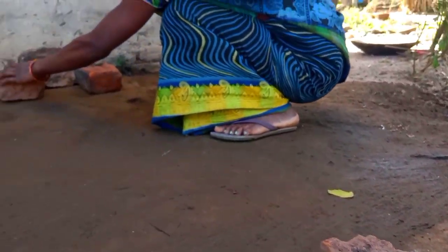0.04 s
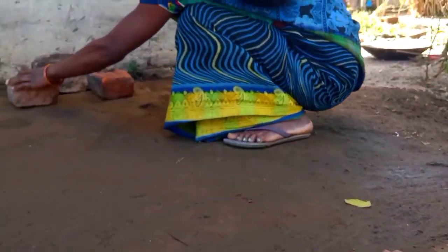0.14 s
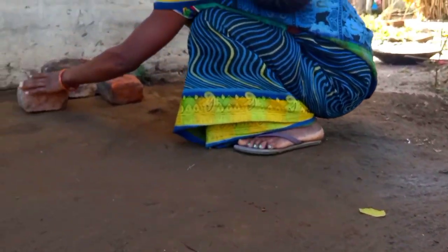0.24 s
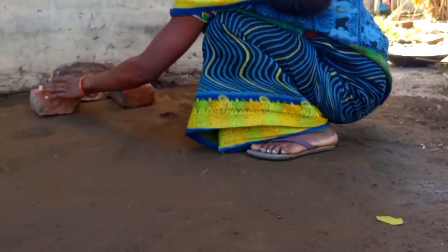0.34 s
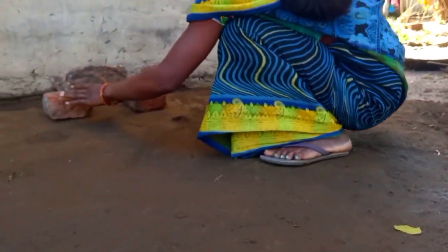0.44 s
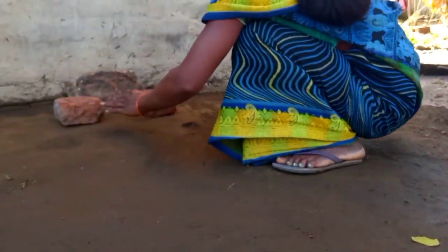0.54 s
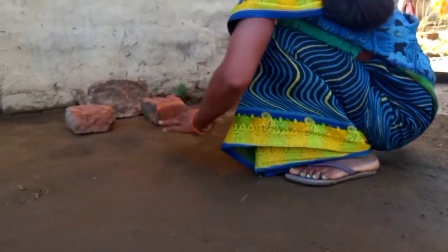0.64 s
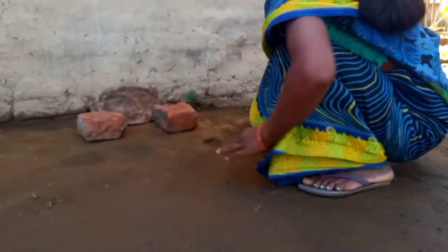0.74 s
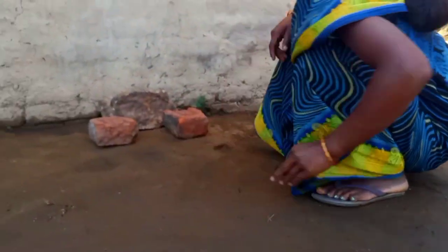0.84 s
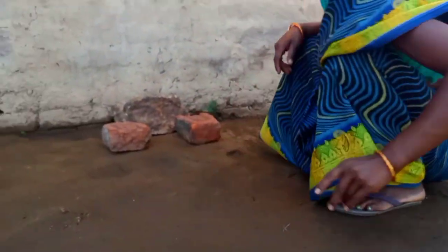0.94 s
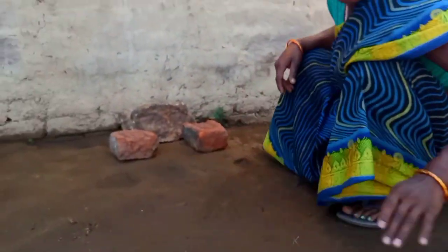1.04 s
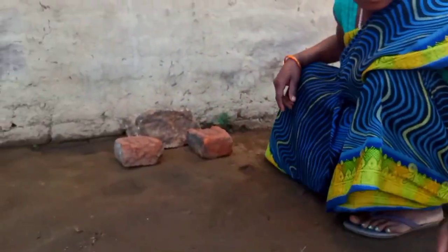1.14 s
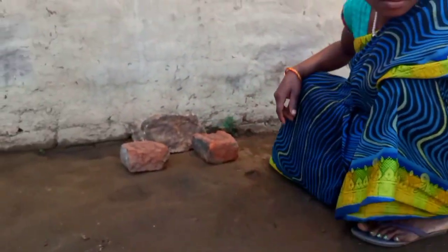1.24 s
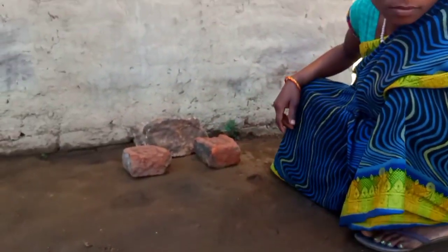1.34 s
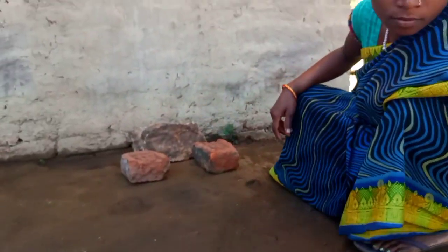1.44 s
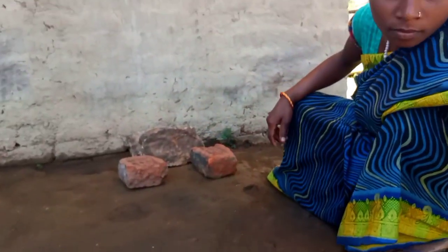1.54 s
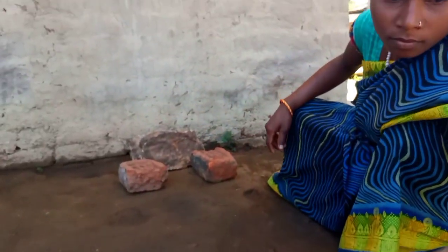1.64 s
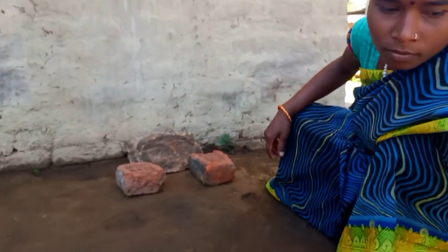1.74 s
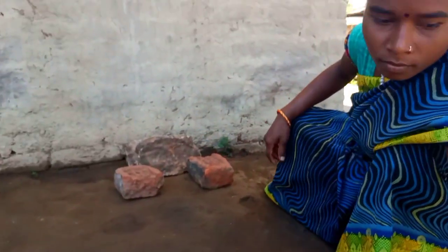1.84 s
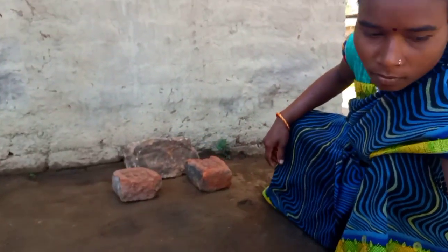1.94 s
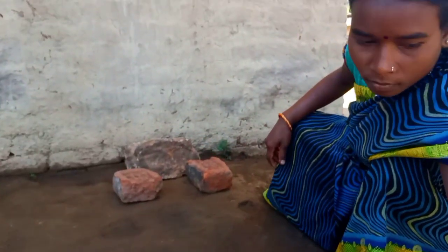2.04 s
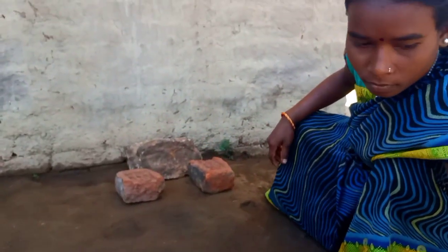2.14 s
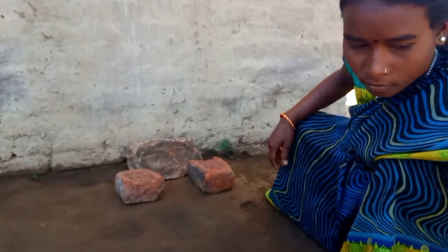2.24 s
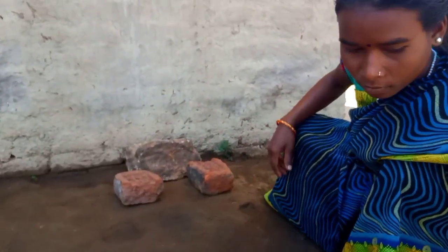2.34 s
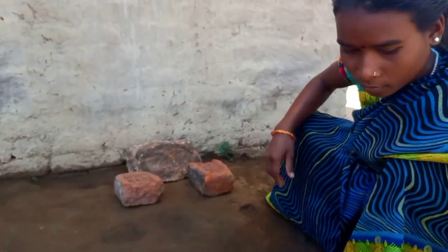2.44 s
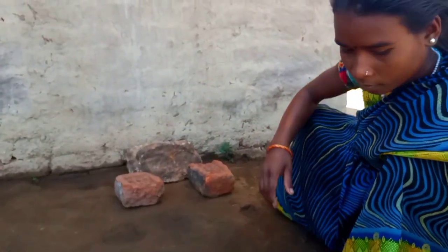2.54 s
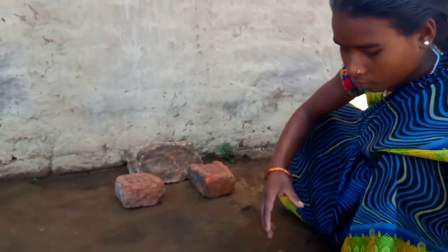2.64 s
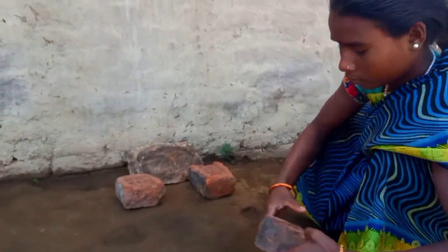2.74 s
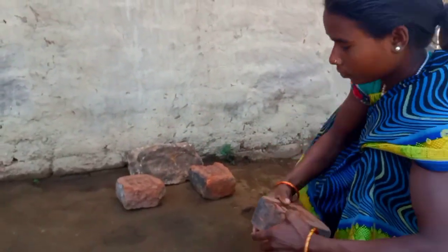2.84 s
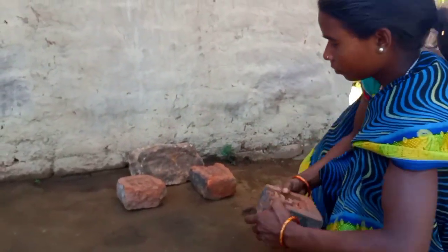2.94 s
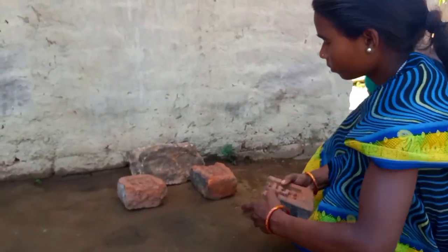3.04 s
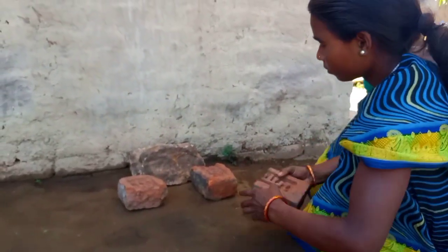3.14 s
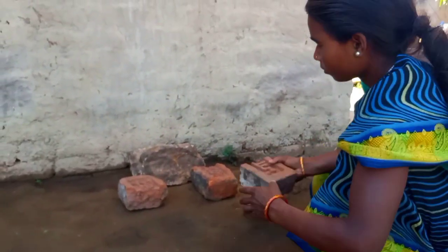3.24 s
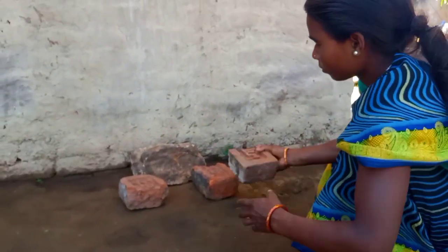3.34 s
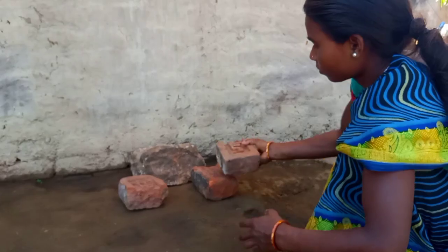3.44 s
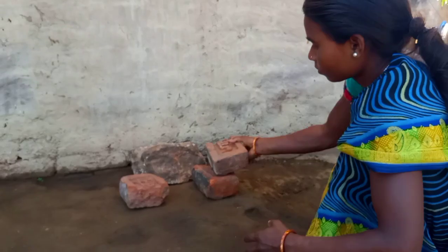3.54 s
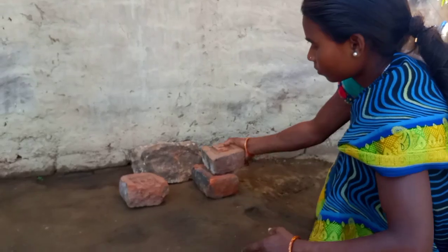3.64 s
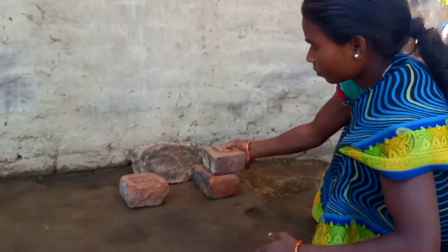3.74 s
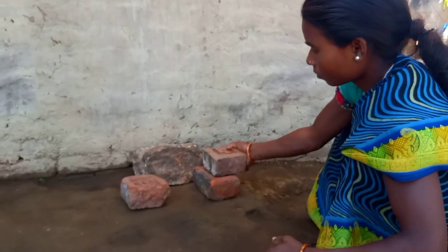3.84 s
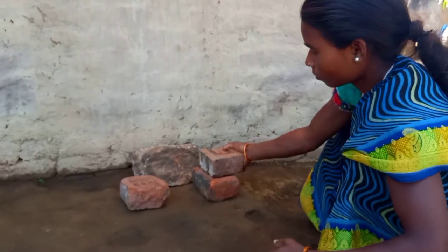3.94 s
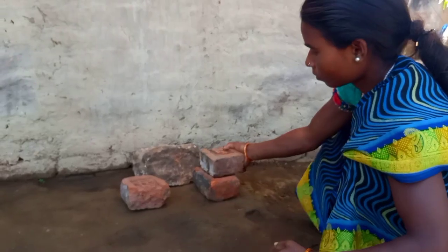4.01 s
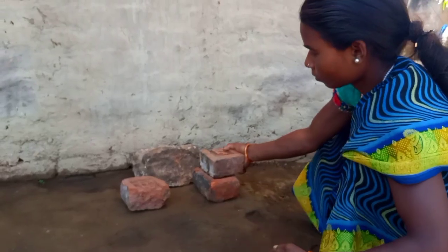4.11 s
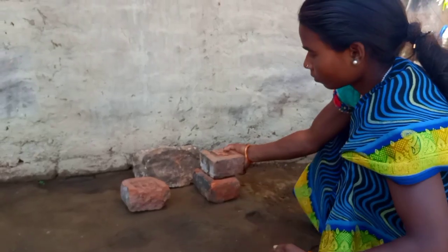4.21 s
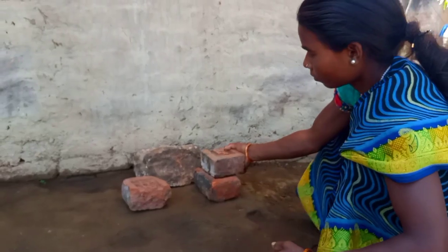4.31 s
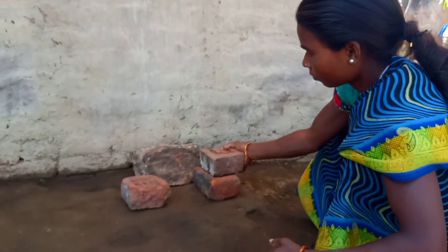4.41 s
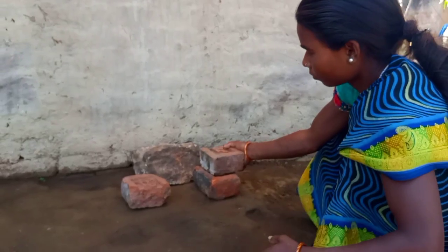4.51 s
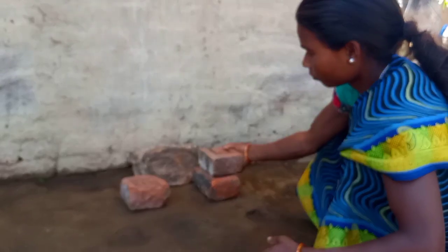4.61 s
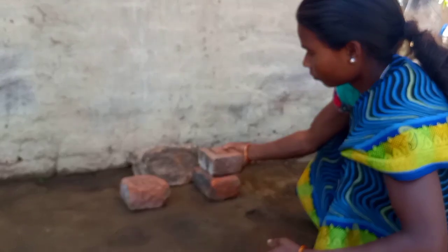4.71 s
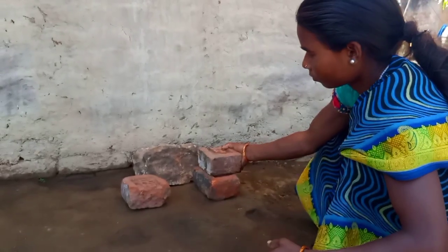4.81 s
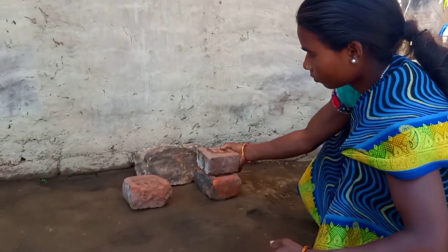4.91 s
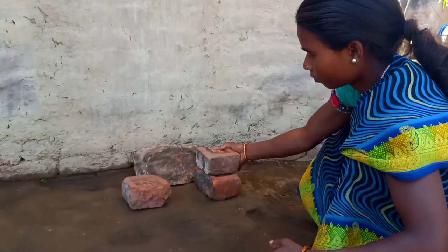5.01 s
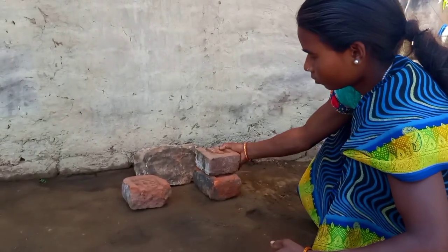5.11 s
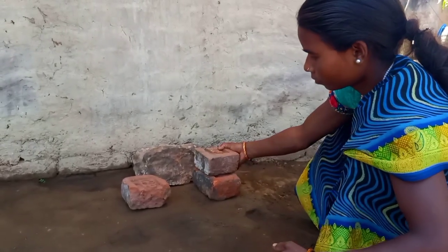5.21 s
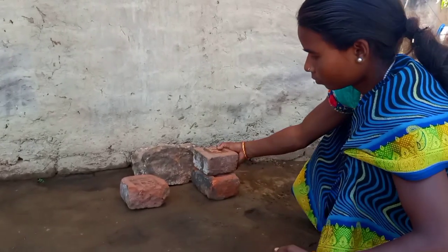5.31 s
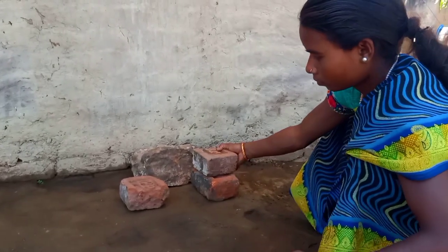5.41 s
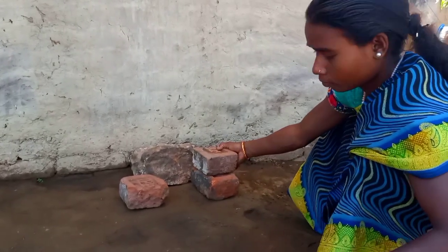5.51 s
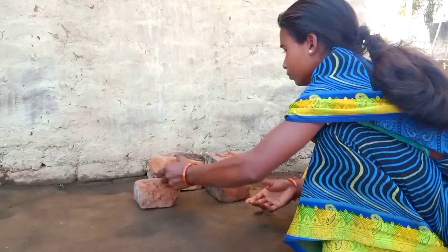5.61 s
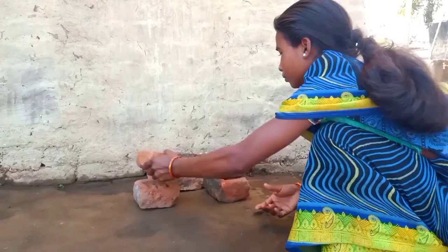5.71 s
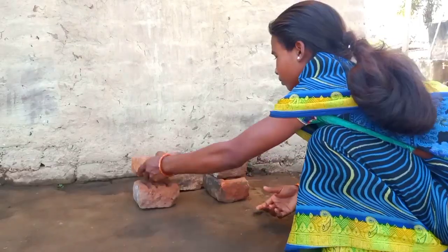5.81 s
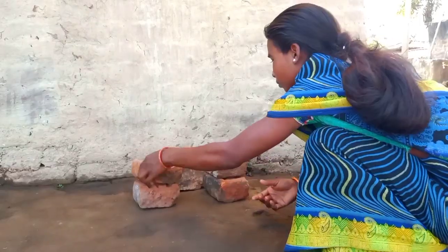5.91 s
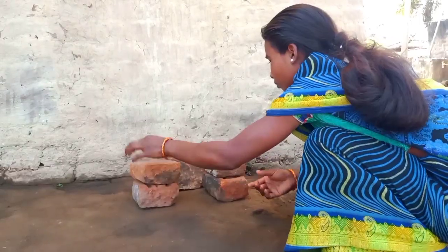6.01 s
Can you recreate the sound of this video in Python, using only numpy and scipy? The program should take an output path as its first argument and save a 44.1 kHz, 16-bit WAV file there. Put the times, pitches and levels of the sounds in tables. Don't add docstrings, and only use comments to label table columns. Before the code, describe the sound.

Close to a phone microphone in a yard beside a wall, one loud bright brick clink rings and fades quickly. After a long quiet gap come small ticks, a sharp clack and a short gritty drag. Later a brick settles with a snap and twisting rasp, then faint rubs and a soft grind. A firm, dull double knock ends it.

```python
import sys
import numpy as np
from scipy import signal
from scipy.fft import rfft, irfft
from scipy.io import wavfile
from scipy.ndimage import uniform_filter1d

SR = 44100
rng = np.random.default_rng(int(sys.argv[2]) if len(sys.argv) > 2 else 0)


def generate_wav(signal):
    frames = np.transpose(np.atleast_2d(signal))
    scaled = np.clip(frames, -1, 1) * 32767
    pcm = np.round(scaled).astype(np.int16)
    wavfile.write(sys.argv[1], SR, pcm)


def level_to_linear(level):
    exponent = np.asarray(level, float) / 20
    return 10 ** exponent


N = 267246
LEAD = 350
PHONE_HZ = 16000

# start_s, peak_db, grip_ms (until hand or ground chokes the ring), echo_db, echo_length (factor)
BLOWS = [(0.4783, -9.5, 15, -12, 0.67), (0.4852, -18.5, 15, -8, 0.94), (2.2737, -47, 1.3, -5.5, 0.4),
         (2.3328, -32, 3, -6, 0.59), (2.4047, -20, 0.79, -2.5, 0.18), (2.4114, -32.5, 7, -9.5, 0.67),
         (2.4967, -48.5, 7.89, -7, 0.22), (3.6893, -22.5, 0.54, -12, 0.19), (3.739, -40.5, 2.8, 0, 0.78),
         (4.905, -53.5, 9.16, -14, 0.69), (5.9572, -19.5, 1.5996, -9.5, .4),
         (5.9601, -9.5, 8.7, -24.5, 0.23)]
# start_s, stop_s
IDLE_SPANS = [
    (1.95, 2.23),
    (2.885, 2.99),
    (3.04, 3.43),
    (3.615, 3.65),
    (5.76, 5.84),
]


def evened(x):
    return x / np.sqrt(np.mean(x ** 2) + 1e-30)


def read(points, hz):
    f, value = np.transpose(points)
    return np.interp(np.log(hz + 1), np.log(f + 1), value)


def coloured(x, points):
    gain = level_to_linear(read(points, np.fft.rfftfreq(len(x), 1 / SR)))
    return irfft(rfft(x) * gain, len(x))


def add(mix, s, sound):
    part = mix[round(s * SR):][:len(sound)]
    part += sound[:len(part)]


def during(spans, edge_s):
    t = np.arange(N) / SR
    half = edge_s / 2
    gain = np.zeros(N)
    for start, stop in spans:
        gain += np.interp(t, [start - half, start + half, stop - half, stop + half], [0, 1, 1, 0])
    return gain


def struck(body, rise_ms, grip_ms, blur=1, size=4096):
    hz, width_hz, level_db = np.transpose(body)[:, :, None]
    ms = 1000 * (np.arange(size) - LEAD) / SR
    swell = 1 / (1 + np.exp(-ms / rise_ms))
    after_ms = rise_ms * np.logaddexp(0, ms / rise_ms)
    dying = np.exp(-np.pi * blur * width_hz * after_ms / 1000 - (after_ms / grip_ms) ** 2)
    sines = np.sin(2 * np.pi * (hz * ms / 1000 + rng.random(hz.shape)))
    return swell * (level_to_linear(level_db) * width_hz * dying * sines).sum(0)


def yard(bright_db, slow, decays=None):
    # hz, t60_s
    yard_decays = [(120, 0.35), (340, 0.12), (960, 0.18), (1400, 0.026), (1800, 0.19), (2300, 0.071),
                   (3800, 0.15), (5400, 0.067), (7500, 0.19)]
    if decays is None:
        decays = yard_decays
    hz, t, z = signal.stft(rng.standard_normal(SR // 2), SR, nperseg=128)
    hz = hz[:, None]
    level_db = -60 * t / (slow * read(decays, hz)) + bright_db * np.log2((hz + 200) / 2000)
    tail = signal.istft(z * level_to_linear(level_db), SR, nperseg=128)[1]
    tail = tail * np.linspace(1, 0, len(tail))
    return tail / np.linalg.norm(tail)


def ripple():
    # start_s, stop_s
    still = [
        (.02, .435),
        (3.454, 3.55),
    ]
    wave = 1 - np.cos(2 * np.pi * np.arange(N) / 1024)
    return 1.4 * wave * during(still, .004)


def knocks():
    # hz, width_hz, level_db; first the full clear ring
    clink = [(523.9, 23, -17.5), (1184.7, 60, -9.5), (1797, 50, -7), (886, 29, -21), (2410, 30, -3),
             (2575.8, 47, -1), (2755, 49, -8.5), (3010, 48, -6.5), (3020, 30, -12), (3340, 48, -5.5),
             (3650, 40, -4), (4037.4, 30, -2), (4180, 21, -5),
             (4454.7, 38, -4.5), (4737, 60.22, -9), (5070, 66, -10), (2158.9, 220, -10), (5250, 120, -11),
             (5470, 59.54, -13), (5943, 54, -19), (6190, 96, -22), (6477, 76, -24), (6920, 94, -23.5),
             (7270, 90, -29.5)]
    tick = [(2200, 1100, 3.5), (3495, 1300, -3.5), (4900, 1300, -5), (6280, 1200, -8.5)]
    tap = [(2390, 360, 0), (3990, 580, -12), (5200, 2700, -9), (6270, 450, -19.5)]
    clack = [(1956.8, 600, -36), (3209, 970, 14), (5020, 96, 7)]
    bounce = [(1920, 76, 15), (2940, 1300, 6), (3707, 650, 8), (5700, 690, -11), (6754.7, 280, -12.5),
              (6980, 68, -33)]
    settle = [(1800, 980, -2), (2850, 960, -12), (4152.4, 340, 0), (925, 980, -16.5)]
    snap = [(450, 309.4, -38), (1436.5, 550, -39), (3520, 258.53, 0), (4520, 370, -6.5), (5300, 600, -15),
            (6538.5, 280, -31)]
    catch = [(2640, 110, -24), (4052, 120, -17.5), (4690, 120, 16.5), (5577, 90, -7)]
    nudge = [(3230, 300, -10), (4033, 160, 9), (4920, 260, 0.5), (5440, 300, -3.5)]
    thud = [(551, 79, -2), (1045.6, 200, -5), (1591.9, 300, -11.5), (2268.5, 120, -14.5), (3365, 91, -23.5),
            (4189.7, 300, -28.5), (5514, 230, -33), (6295.1, 140, -49), (6813, 120, -54)]
    # hz, level_db
    light = [(200, -24), (600, -9), (1300, -1.5)]
    ring = clink
    bodies = ring, ring, tick, tap, clack, bounce, settle, snap, catch, nudge, thud, thud
    out = np.zeros(N)
    for (s, peak_db, grip_ms, echo_db, slow), body in zip(BLOWS, bodies):
        rise_ms, bright_db = .36, 0.0971
        if body is thud:
            rise_ms, bright_db = 0.43, 3
        if body is tap or body is clack:
            rise_ms = 0.19
        if body is catch or body is nudge:
            rise_ms, bright_db = 1.8, 3.5
        blow = struck(body, rise_ms, grip_ms)
        if body in (tick, tap, clack, bounce):
            blow = coloured(blow, light)
        blow *= level_to_linear(peak_db) / abs(blow).max()
        crack = struck(body, 0.071, 0.97, blur=3.4)
        echo = signal.fftconvolve(crack, yard(bright_db, slow))
        if body in (clack, bounce):
            echo = coloured(np.pad(echo, (0, len(echo) % 2)), light)
        echo *= level_to_linear(echo_db) * np.linalg.norm(blow) / np.linalg.norm(echo)
        add(out, s - LEAD / SR, blow)
        add(out, s - LEAD / SR, echo)
    return out


def murmurs():
    # start_s, level_db
    onsets = [
        (.480, -28),
        (5.962, -42.5),
    ]
    # hz, level_db
    tones = [
        [(120, -74.5), (200, -44.5), (476, -14), (682, -23), (792, -12.5), (893, -25), (1020, -10.5),
         (1530, -17), (1780, -4), (3050, -6.5), (3430, -15.5), (3870, -7), (7150, -41), (9300, -72),
         (15700, -120)],
        [(120, -33.5), (200, -17), (353, -24.5), (469, -0.5), (703, -4.5), (920, -13.5), (1300, -11), (1750, 0),
         (1920, -6), (2360, -9), (3050, -19), (3990, -12), (7150, -30.5), (9300, -63), (15700, -120)],
    ]
    # hz, t60_s
    dampings = [
        [(300, 0.16), (1000, 0.14), (1800, .2), (2300, .15), (3500, 0.1416), (5000, 0.15), (7000, .12)],
        [(300, 0.092), (1000, 0.13), (1800, 0.1), (3000, .12), (5000, 0.11), (7000, 0.11)],
    ]
    # hz, width_hz, level_db
    lasting_modes = [(529, 11, -9), (1766, 8.4, -4.5), (1738, 10, 0.5), (1954, 13, -4), (2260, 16, -6),
                     (3055, 16, -8), (3684, 14, -7.5), (5250, 15, -14)]
    out = np.zeros(N)
    for (s, level_db), tone, damping in zip(onsets, tones, dampings):
        tail = coloured(np.pad(yard(0, 1, damping), 2000), tone)[2000:-2000]
        tail *= 1 - np.exp(-np.arange(len(tail)) / 60)
        peak_rms = np.sqrt(uniform_filter1d(tail ** 2, size=400).max())
        add(out, s, level_to_linear(level_db) * tail / peak_rms)
    ring = struck(lasting_modes, .5, 120, size=9000)
    add(out, BLOWS[0][0] - LEAD / SR, level_to_linear(-30) * ring / abs(ring).max())
    return out


def hiss():
    # hz, level_db
    air_tone = [(120, -29.5), (300, -6.5), (550, -3), (900, -5), (1800, -3.5), (3000, -6.5), (5000, -5.5),
                (7000, -13.5), (9000, -41.5)]
    # start_s, stop_s
    open_spans = [
        (0.478, 1.936),
        (2.275, 2.83),
        (3.673, 5.745),
        (5.855, 6.1),
    ]
    # start_s, level_db, t60_s
    stirs = [
        (.5, -77, .7),
        (1.33, -104, 0.8988),
        (2.29, -87.5, 1),
        (3.69, -93, 3.1),
        (4.64, -99, 1.1),
        (4.9, -98, 1.8),
        (5.29, -101, 0.5),
    ]
    # hz, level_db
    loop_lines = [(549.1, -115), (651.4, -115), (850.6, -114), (1798, -113), (2600, -115), (2751, -117),
                  (2848, -116), (3149, -117), (3548, -116), (4000, -113), (4199, -117), (4398, -118)]
    settled, edge_s, fresh_share = level_to_linear(-102.5), .03, .45
    t = np.arange(N) / SR

    turn, size = rng.standard_normal((2, SR // 100 + 1))
    scrap = irfft(np.exp(9j * turn) * level_to_linear(2 * size), SR // 50)
    fresh = evened(coloured(rng.standard_normal(N), air_tone))
    loop = evened(coloured(np.resize(scrap, N), air_tone))
    loop = evened(loop + .12 * fresh)
    lines = np.zeros(N)
    for hz, level_db in loop_lines:
        lines += level_to_linear(level_db) * np.sin(2 * np.pi * 50 * round(hz / 50) * t)

    stirred = np.zeros(N)
    for s, level_db, t60 in stirs:
        dying_db = level_db - 60 * np.maximum(t - s, 0) / t60
        stirred += during([(s, N / SR + 1)], edge_s) * level_to_linear(dying_db)
    opened = during(open_spans, edge_s)
    looped = opened * (settled + (1 - fresh_share) * stirred)
    idle = level_to_linear(-114) * during(IDLE_SPANS, edge_s)
    return loop * (looped + idle) + lines * looped / settled + fresh_share * fresh * stirred * opened


def whine():
    t = np.arange(N) / SR
    tone = np.zeros(N)
    for k in range(3):
        tone += level_to_linear(-6.5 * k) * np.sin(2 * np.pi * (k + 1) * PHONE_HZ / 8 * t)
    flutter_db = 2.7 * evened(uniform_filter1d(rng.standard_normal(N), size=1500))
    return tone * level_to_linear(-108 + flutter_db) * during(IDLE_SPANS, .01)


def pressure(touch, push, lift, touch_db, end_db):
    land_s, land_db, lift_db, lift_bend = .014, 20.5, 37.5, 0.93
    t = np.arange(-land_s, push + lift, 1 / SR)
    held_db = np.interp(t, [-land_s, 0, push], [touch_db - land_db, touch_db, end_db])
    lifted = np.clip((t - push) / lift, 0, 1) ** lift_bend
    return touch + t, held_db - lift_db * lifted


def slide(stroke, body, dust_db):
    # hz, level_db
    dust_tone = [(120, -56), (200, -15), (587, -15.5), (1510, -11), (2000, -10), (3430, -6), (3870, 9),
                 (4230, -21), (4850, -4.5), (7150, -22), (9300, -47), (15700, -120)]
    grains_per_s = 2500
    t, now_db = pressure(*stroke)
    chance, _, sign, _, sand = rng.random((len(t), 5)).T
    grains = (chance < grains_per_s / SR) * np.sign(sign - .5)
    faces = signal.fftconvolve(grains, struck(body, 0.18, 6.7, blur=1.4))[LEAD:][:len(t)]
    crowding = uniform_filter1d(abs(grains), size=40)
    dust = coloured((sand - .5) * (1 + 4 * crowding), dust_tone)
    ringing = level_to_linear(.3 * (now_db - now_db.max()))
    rasp = evened(ringing * evened(faces) + level_to_linear(dust_db) * evened(dust))
    return t[0], rasp * level_to_linear(now_db) * signal.windows.tukey(len(t), .06)


def slides():
    # touch_s, push_s, lift_s, touch_db (pressure at touch), end_db (pressure at end of push)
    strokes = [
        (2.284, .004, 0.036, -75, -82.5),
        (2.345, 0.013469, 0.06366, -58, -46.5),
        (3.687, .048, .006, -73.5, -67.5),
        (3.742, 0.038, 0.081, -56, -54),
        (4.05, .032, 0.086, -81, -72),
        (4.636, 0.029, 0.056, -71, -71),
        (4.901, .083, 0.098, -70.5, -63.5),
    ]
    sand_levels = [-3, -6, -7.5, -18.5, -4, -9.5, -5]
    # hz, width_hz, level_db
    drag = [(2111.9, 160, -5), (2520, 31, 1.5), (3282, 34, -10.5), (4000, 32, 0.5), (4200, 10, -7.5),
            (5160, 17, -9), (6210, 71, -37)]
    twist = [(2584.7, 130, -10.5), (3850, 27, 6.5), (4310, 19, 0.5), (4869, 43, -6.5), (4810, 90, 0),
             (5480, 74, -6), (6335, 23, -20)]
    shift = [(1770, 260, -6), (2450, 150, -8), (4070.1, 110, 10), (4837.3, 100, 12.5), (5530, 330, -7)]
    rub = [(2497.8, 410, -10.5), (4000, 380, 4.5), (4907, 220, 5.5), (5350, 300, -3), (6600, 400, -12.5)]
    grind = [(1774.5, 260, -14), (3167.9, 170, 0), (4260.8, 300, -4), (3650, 300, -13), (4621.8, 300, -9),
             (5200, 340, -11), (5700, 300, -18.5)]
    out = np.zeros(N)
    for stroke, body, dust_db in zip(strokes, (drag, drag, twist, twist, shift, rub, grind), sand_levels):
        add(out, *slide(stroke, body, dust_db))
    return out + level_to_linear(-13.5) * signal.fftconvolve(out, yard(0.12, 0.74))[:N]


def scene():
    rasps = slides()
    return np.tile(knocks() + murmurs() + rasps + hiss() + whine(), (2, 1))


def band_limit(x):
    return signal.sosfilt(signal.butter(12, 9700, fs=SR, output="sos"), x)


def record(dry):
    hz = np.fft.rfftfreq(N, 1 / SR)
    overloaded = 0.44 * np.tanh(dry / 0.44)
    phone_band = [(40, -15.5), (150, -8.0), (300, 1.5), (6500, 1), (7200, -4.5), (7600, -13), (8000, -54.5)]
    band = irfft(rfft(overloaded) * level_to_linear(read(phone_band, hz)), N)
    mirror = band * np.cos(2 * np.pi * PHONE_HZ * np.arange(N) / SR)
    image_band = [(7900, -90), (8400, -8), (9000, -12.5), (9600, -21), (10200, -53), (16000, -78.5),
                  (17000, -120)]
    wide = band + irfft(rfft(mirror) * level_to_linear(read(image_band, hz)), N)
    wide += level_to_linear(-21.5) * np.diff(band, prepend=0) * [[1], [-1]]
    step, offset_steps = 2 ** -15, 45.3
    return band_limit(step * np.round(wide / step + offset_steps + ripple()))


dry = scene()
out = record(dry)
generate_wav(out)
```